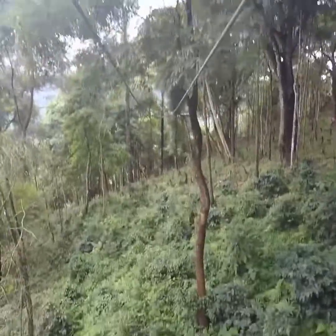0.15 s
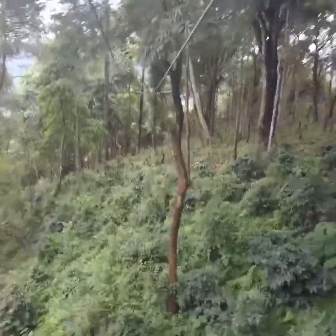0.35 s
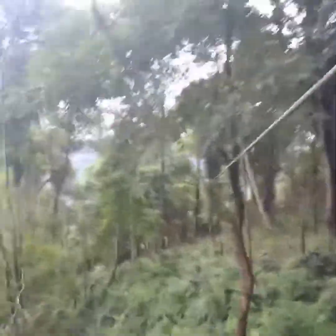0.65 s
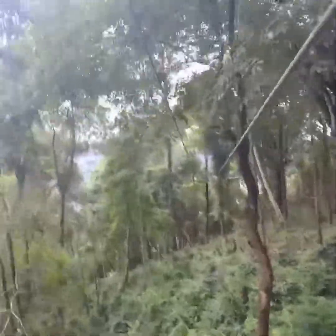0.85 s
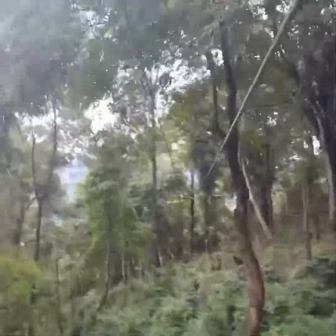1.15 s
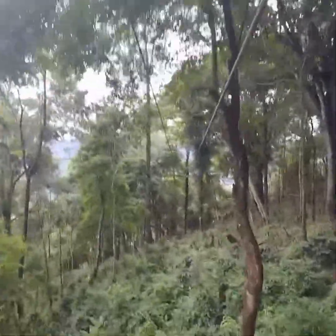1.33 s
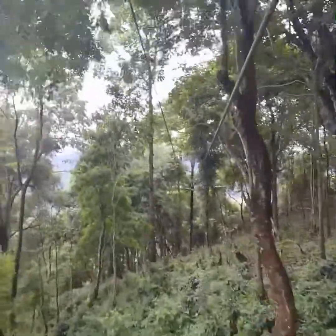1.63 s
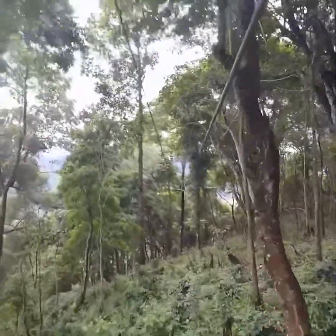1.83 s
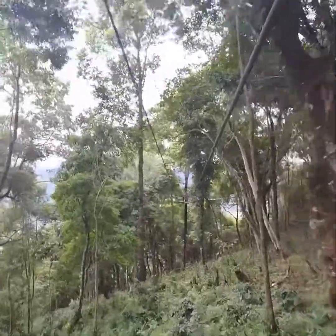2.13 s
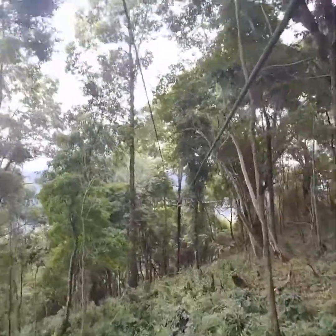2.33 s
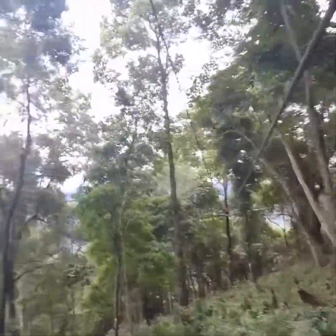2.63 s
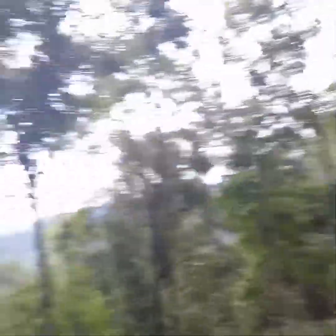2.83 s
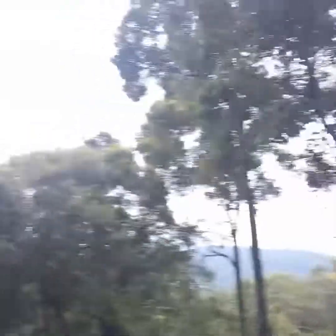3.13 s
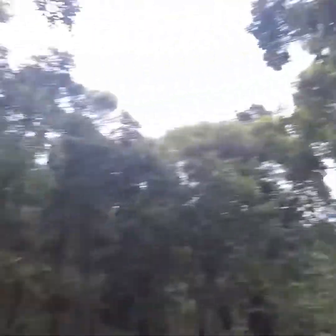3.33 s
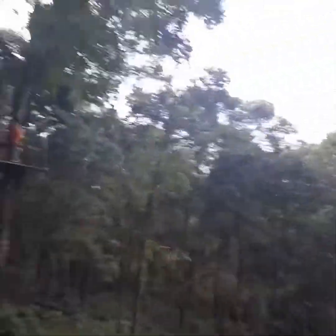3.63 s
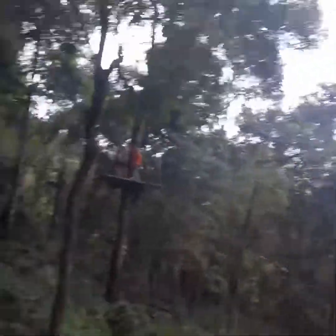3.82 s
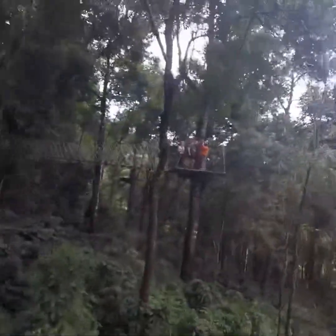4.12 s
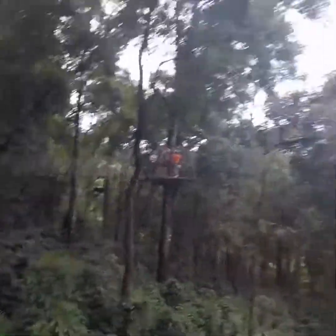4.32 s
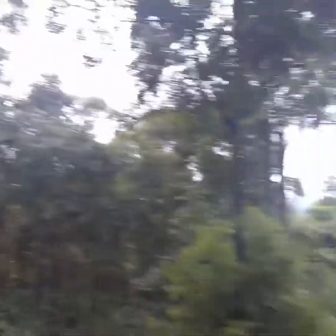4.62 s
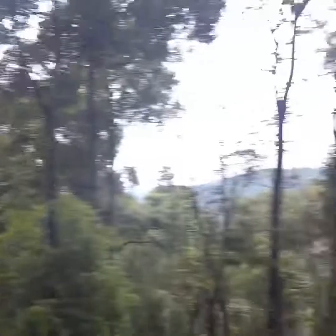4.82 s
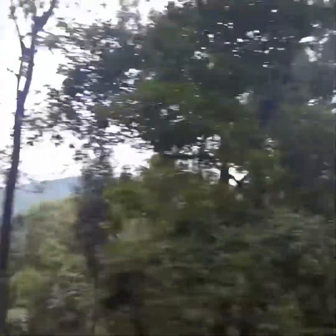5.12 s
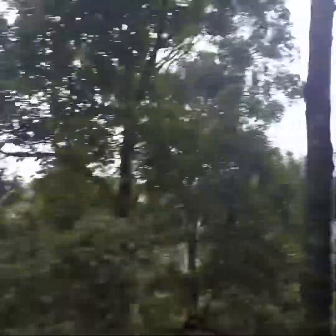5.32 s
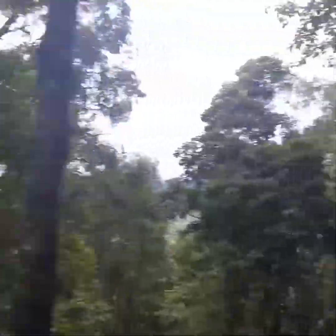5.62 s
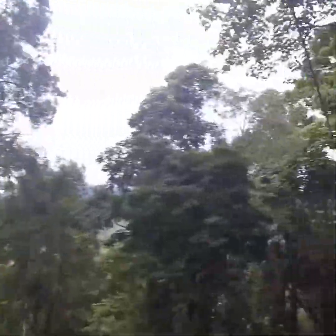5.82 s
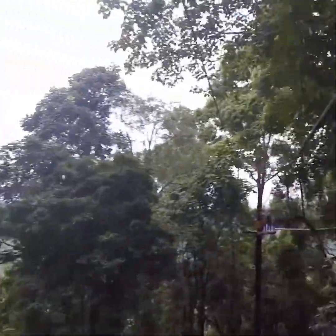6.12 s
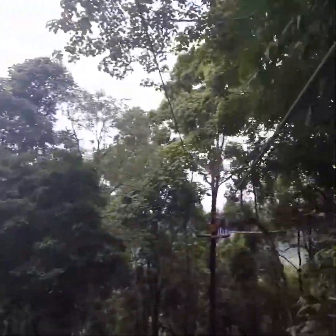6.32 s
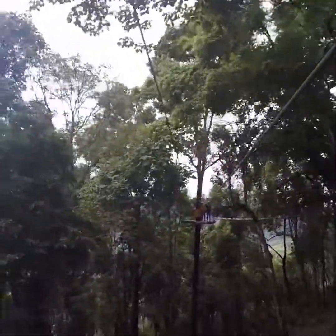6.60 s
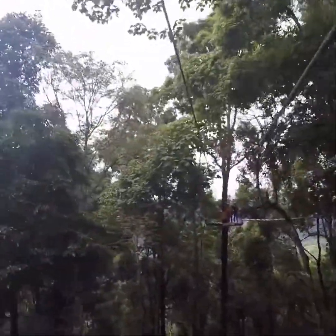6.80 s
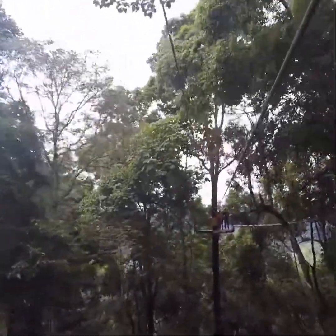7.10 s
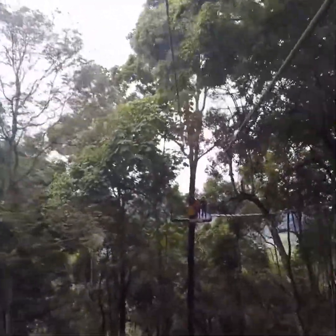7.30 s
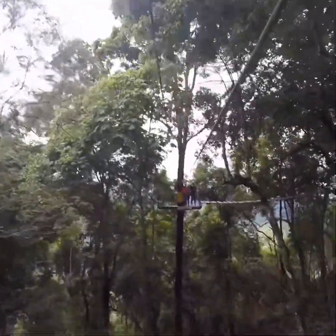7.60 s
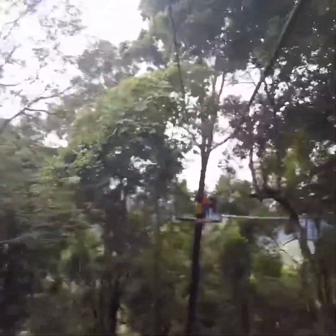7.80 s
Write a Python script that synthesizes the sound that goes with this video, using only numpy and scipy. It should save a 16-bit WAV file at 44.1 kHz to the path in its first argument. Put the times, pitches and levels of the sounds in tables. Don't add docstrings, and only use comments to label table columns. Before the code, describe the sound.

Pulley wheels race along a steel cable, hissing and whining ever higher, while wind rumbles and fingers knock the handheld microphone.

```python
import sys
import numpy as np
from scipy import signal
from scipy.fft import rfft, irfft, next_fast_len
from scipy.io import wavfile
from scipy.ndimage import uniform_filter1d, map_coordinates

SR = 44100
rng = np.random.default_rng(int(sys.argv[2]) if len(sys.argv) > 2 else 0)


def to_linear_factor(level_db):
    exponent = np.asarray(level_db, float) / 20
    return 10 ** exponent


def wav_record(signal):
    frames = np.transpose(np.atleast_2d(signal))
    bounded = np.clip(frames, -1, 1)
    quanta = np.round(bounded * 32767).astype(np.int16)
    wavfile.write(sys.argv[1], SR, quanta)


N = 350595

# [t/s, hiss level/dB]
ROLLING_LEVEL = [(0, -39.5), (.15, -37.5), (.37, -42), (.66, -34), (.8, -32), (1.2, -22), (1.45, -22.5),
                 (2.7, -20.5), (3.12, -24), (3.46, -26.5), (4.4, -27), (4.5, -24), (4.95, -21.5),
                 (5.27, -23), (5.38, -20.5), (5.67, -22.5), (5.85, -20.5), (7.95, -20)]
# [t/s, pose 0 setting off .. 8 near the far end]
CAMERA_POSE = [(0, 0), (.55, 0), (.8, 1), (1, 1), (1.25, 2), (2, 2), (2.9, 3), (3.14, 3), (3.3, 4),
               (3.5, 4), (3.75, 5), (4.55, 5), (4.68, 6), (4.9, 6), (5.3, 7), (5.8, 7), (6.3, 8), (7.95, 8)]


def unit(x):
    return x / np.sqrt(np.mean(x ** 2) + 1e-20)


def along(points, hz):
    f, v = np.transpose(points)
    return np.interp(np.log(hz + 1), np.log(f + 1), v)


def curves(rows):
    s, *cols = np.transpose(rows)
    return [np.interp(np.arange(N) / SR, s, c) for c in cols]


def posed(rows):
    pose, = curves(CAMERA_POSE)
    return [np.interp(pose, np.arange(len(rows)), c) for c in np.transpose(rows)]


def wobble(rate_hz):
    knots = rng.standard_normal(int(N * rate_hz / SR) + 4)
    return map_coordinates(knots, [np.arange(N) * rate_hz / SR])


def filtered(x, response):
    m = next_fast_len(N + SR // 2)
    return irfft(rfft(x, m) * response(np.fft.rfftfreq(m, 1 / SR)), m)[..., :N]


def causal(x, gain):
    m = 8192
    cep = irfft(np.log(gain(np.fft.rfftfreq(m, 1 / SR)) + 1e-6), m)
    cep = np.concatenate([cep[:1], 2 * cep[1:m // 2], np.zeros(m // 2)])
    kernel = irfft(np.exp(rfft(cep)), m)[:m // 2]
    return signal.oaconvolve(x, kernel)[:N]


def mode(f, hz, width_hz):
    return 1j * f * width_hz / (hz * hz - f * f + 1j * f * width_hz)


def impulses(times_s, sizes):
    return np.bincount(np.round(np.asarray(times_s) * SR).astype(int), sizes, N)[:N]


def decaying(hits, decay_s):
    return signal.lfilter([1], [1, -np.exp(-1 / (decay_s * SR))], hits)


def patchy(depth_db, modes_db):
    z = signal.stft(rng.standard_normal(N), nperseg=1024, noverlap=768)[2]
    patches = uniform_filter1d(uniform_filter1d(rng.standard_normal(z.shape), 20, 0), 3, 1)
    modes = uniform_filter1d(rng.standard_normal(z.shape), 18, 1)
    field = to_linear_factor(depth_db * unit(patches) + modes_db * unit(modes))
    return signal.istft(z * field, nperseg=1024, noverlap=768)[1][:N]


def rattle(per_s, spread_db, decay_s):
    when, chance, size = rng.random((int(400 * N / SR), 3)).T
    sizes = to_linear_factor(spread_db * np.minimum(-np.log(size), 2.5))
    hits = impulses(when * (N - 1) / SR, (chance < per_s / 400) * sizes)
    return unit(decaying(hits, decay_s))


def contact_force(pose):
    # [t/s, level over rolling force/dB]
    jolt_table = [
        (.055, 3),
        (.066, -1),
        (0.075, 6),
        (0.0848, 23.5),
        (0.492, 17),
        (0.515, 11),
        (0.611, 17),
        (1.107, 10),
    ]
    s, db = np.transpose(jolt_table)
    jolts = decaying(impulses(s, to_linear_factor(db)), decay_s=.0013)
    loose = .42 + .45 * np.clip(1 - pose, 0, 1)
    knocks = rng.standard_normal(N) * (loose * rattle(per_s=170, spread_db=2.5, decay_s=.003) + jolts)
    rough = patchy(depth_db=1.0, modes_db=3.0) * to_linear_factor(0.11 * wobble(13) + 0.17 * wobble(40))
    return unit(rough) + filtered(knocks, lambda f: 1 - 1 / (1 + (f / 2600) ** 4))


def frame_sound(force, pose):
    # [f/Hz, width/Hz, level above hiss/dB]
    frame_modes = [(1890, 50, 7.5), (2140, 60, 3), (3240, 90, 3), (3740, 60, 5), (4725, 120, 9.5),
                   (5765, 110, 6), (7010, 160, 6), (9080, 180, 5), (10280, 230, 7), (10815, 50, 7.5),
                   (12470, 230, 2.5), (13960, 260, 6.5)]
    directness = [1.5, 1.2, .8, .8, .8, .5, .45, 1.1, 1]
    # [f/Hz, level per Hz/dB]
    setting_off = [(350, -26.4), (690, -26.9), (1050, -11.5), (1620, -17.8), (2150, -2.5), (2750, 0.0),
                   (3050, -12.9), (3350, -3.5), (4550, -14.1), (5000, -20.8), (6350, -6.9), (10250, -20.4),
                   (11150, -33.9), (15200, -36.4)]
    speeding_up = [(350, -38.2), (560, -25.8), (770, -29.3), (1050, -13.6), (1310, -18.4), (2150, -4.9),
                   (3350, 0.0), (5000, -17.0), (6050, -5.7), (6800, -10.9), (10550, -18.6), (11600, -35.7),
                   (13250, -30.5), (15200, -37.9)]
    along_cable = [(350, -32.9), (500, -43.6), (2600, -8.3), (3500, -7.5), (3800, 0.0), (4100, -12.2),
                   (4550, -13.0), (5000, -19.9), (6800, -6.8), (8150, -26.9), (10400, -19.4),
                   (11750, -44.3), (12350, -32.9), (15200, -42.9)]
    swinging_out = [(350, -39.9), (1170, -16.4), (1450, -25.4), (2150, 0.0), (2900, -8.3), (3050, -15.5),
                    (3200, -0.4), (5300, -21.5), (6200, -6.2), (8900, -18.1), (10400, -16.6),
                    (11450, -36.0), (11750, -26.6), (15200, -37.7)]
    turned_away = [(350, -40.7), (1450, -25.0), (2000, -3.1), (3200, -11.2), (3350, 0.0), (3950, -6.2),
                   (4250, -18.2), (6650, -1.8), (8000, -24.1), (9050, -25.5), (10100, -12.0),
                   (11600, -34.3), (13550, -27.9), (15200, -41.1)]
    swinging_back = [(350, -38), (850, -30), (1310, -25), (2000, 0), (2750, 0), (2900, -10), (3350, -2),
                     (5300, -17), (6500, -5), (8450, -19), (10400, -14), (11150, -25), (15200, -35)]
    ahead = [(350, -39.8), (560, -39.7), (1450, -26.7), (1800, -9.5), (3500, -5.2), (3650, 0.0),
             (5000, -21.5), (5750, -7.5), (6350, -16.3), (6800, -5.6), (8450, -25.4), (10100, -17.9),
             (11450, -31.7), (15200, -35.6)]
    poses = [setting_off, speeding_up, along_cable, along_cable, swinging_out, turned_away, swinging_back,
             ahead, ahead]
    sound = np.zeros(N)
    for k, (broad, ring) in enumerate(zip(poses, directness)):
        def gain(f):
            rings = sum((to_linear_factor(db) - 1) * abs(mode(f, c, w)) ** 2 for c, w, db in frame_modes)
            return to_linear_factor(along(broad, f)) * (1 + ring * rings) * f ** 2 / (f ** 2 + 250 ** 2)
        share = np.clip(1 - abs(pose - k), 0, 1)
        sound += share * unit(causal(force, gain))
    return sound


def rolling():
    # [5-11 kHz/dB, under 1.6 kHz/dB, over 11 kHz/dB, shadow near 11.7 kHz/dB]
    tints = [(-1, 3.5, 1, 0), (.5, 2.5, 2, 2), (-1, -0.5, 3.5, -2), (0.5, -2, 5, 1), (-1, 0.5, 2, 0),
             (-1.5, 2, 1.5, 0), (0.5, 3, 4, -2), (1.5, 2.5, 7.5, -9), (-0.5, 0, -1, 5)]
    hiss_db, = curves(ROLLING_LEVEL)
    pose, = curves(CAMERA_POSE)
    bright_db, body_db, air_db, shadow_db = posed(tints)
    sound = frame_sound(contact_force(pose), pose)
    sound += (to_linear_factor(shadow_db) - 1) * filtered(sound, lambda f: np.exp(-((f - 11650) / 420) ** 4))
    low, mid, high = (filtered(sound, lambda f: 1 / (1 + (f / hz) ** 12)) for hz in (1650, 4700, 11100))
    tinted = to_linear_factor(body_db) * low + (mid - low) + to_linear_factor(bright_db) * (high - mid) + to_linear_factor(air_db - 3.5) * (sound - high)
    even = np.sqrt(np.abs(uniform_filter1d((mid - low) ** 2, size=SR // 4)) + 1e-12)
    return to_linear_factor(hiss_db - 0.52) / even * tinted


def strand_rate_hz():
    # [t/s, strand rate f/Hz]
    speed = [(.85, 250.3), (1.07, 291.3), (1.3, 325.2), (1.9, 361.5), (2.15, 380), (2.33, 410), (2.42, 407),
             (2.7, 437.4), (2.95, 437), (3.28, 465.7), (3.5, 456), (3.85, 494), (4.38, 523), (4.62, 496),
             (4.86, 513), (5.2, 527.7), (5.95, 535.8), (7.95, 522.6)]
    # [t/s, lost f/Hz]
    checks = [(4.5, 28), (4.94, 18.6), (5.37, 20.7), (5.77, 21.3), (6.15, 25.3), (6.47, 26.4), (6.79, 24),
              (7.09, 15.6), (7.36, 24.5), (7.6, 7.7), (7.85, 48)]
    width_s, rebound_s, rebound_share = .06, 0.124, .25
    t = np.arange(N) / SR
    rate_hz, = curves(speed)
    for s, lost_hz in checks:
        dip = np.exp(-((t - s) / width_s) ** 2)
        surge = np.exp(-((t - s - rebound_s) / width_s) ** 2)
        rate_hz = rate_hz + lost_hz * (rebound_share * surge - dip)
    return rate_hz


def whine():
    # [partials 1-5 at full rolling force, level/dB]
    partials = [(-64, -63, -74, -50, -60), (-62, -60, -64, -41, -54), (-59, -61, -48.5, -48.5, -47),
                (-62, -52, -49.5, -44, -37.5), (-59, -46, -55, -34.5, -50), (-57, -48.5, -61, -32.5, -56),
                (-54.5, -41.5, -56, -29, -55), (-56, -44.5, -40.5, -32.5, -57),
                (-62.5, -49, -45.5, -40, -60)]
    # [f/Hz, width/Hz, level/dB]
    cable_modes = [(920, 150, 3.5), (1030, 140, 5.5), (1297, 200, 11), (1587, 67, 4), (1810, 143, 9),
                   (1973, 146, 9), (2170, 79, 8.5)]
    rate_hz = strand_rate_hz()
    start = np.clip((np.arange(N) / SR - .8) / 0.29, 0, 1) * to_linear_factor(curves(ROLLING_LEVEL)[0] + 21)
    phase = 2 * np.pi * np.cumsum(rate_hz * (1 + .007 * wobble(16) + .006 * wobble(70))) / SR
    hz = np.arange(100., 3000, 10)
    carried = 1 + sum((to_linear_factor(db) - 1) * abs(mode(hz, c, w)) ** 2 for c, w, db in cable_modes)
    sound = np.zeros(N)
    for k, db in enumerate(posed(partials), 1):
        level = np.sqrt(2) * to_linear_factor(db - 6 + 1.86 * wobble(18))
        sound += level * np.interp(k * rate_hz, hz, carried) * np.sin(k * phase)
    return start * sound


def rubs(upper):
    # [t/s, length/s, hum level/dB, scrape level/dB]
    strokes = [(0.208, .04, -59, -80), (1.745, 0.033, -51, -54), (2.82, 0.17, -44, -42.5),
               (3.04, 0.084, -47.5, -51), (3.212, 0.046, -50, -60), (3.31, .11, -39.5, -51.5),
               (3.457, 0.049, -53, -69), (7.477, 0.025, -30.5, -39), (7.537, 0.12, -49, -46.5),
               (7.71, 0.019, -36, -52), (7.795, .07, -34, -51), (7.904, 0.059, -49, -48)]
    rise_s, fade_s = 0.0043, 0.022
    hum = unit(filtered(rng.standard_normal(N) * to_linear_factor(1.5 * wobble(60)), lambda f: mode(f, 222, 65) ** 2))
    scrape = unit(filtered(rng.standard_normal(N) * to_linear_factor(2.5 * wobble(80)), upper))
    t = np.arange(N) / SR
    sound = np.zeros(N)
    for s, length_s, hum_db, scrape_db in strokes:
        outside = np.maximum((s - t) / rise_s, (t - s - length_s) / fade_s)
        stroke_db = -10 * np.maximum(outside, 0)
        sound += to_linear_factor(stroke_db + hum_db) * hum + to_linear_factor(stroke_db + scrape_db) * scrape
    return sound


def bumps(first_mode, upper):
    # [t/s, peak level/dB, thump level/dB, knock level/dB]
    blows = [
        (2.816, -27, 4, -13),
        (3.031, -35, 7.5, -11),
        (3.091, -37.5, 15, -11),
        (3.317, -34, 2, -12),
        (7.482, -29, 16, -0.5),
        (7.71, -33.5, 11, -13),
        (7.737, -2, -17, -29),
        (7.825, -17.5, 4.5, -10.5),
    ]
    s, db, thump_db, knock_db = np.transpose(blows)
    ring = filtered(impulses(s, to_linear_factor(db + 37.0)),
                    lambda f: mode(f, *first_mode) * mode(f, 210, 300) / (1 + 1j * f / 300))
    thump = filtered(impulses(s, to_linear_factor(db + thump_db + 52)), lambda f: mode(f, 77, 26.6) / (1 + 1j * f / 150) ** 2)
    knock = filtered(impulses(s, to_linear_factor(db + knock_db + 41.5)), lambda f: upper(f) / (1 + 1j * f / 1500) ** 2)
    return ring + thump + knock


def fingers():
    # [f/Hz, width/Hz, level/dB]
    shell_modes = [(215, 35, 0), (750, 140, 0), (1130, 260, -4)]
    upper = lambda f: sum(to_linear_factor(db) * mode(f, c, w) for c, w, db in shell_modes[1:])
    return rubs(upper) + bumps(shell_modes[0][:2], upper)


def pressure_kinks():
    # [t/s, peak level/dB]
    ticks = [(0.524, -37), (0.619, -34), (0.663, -32), (0.713, -28.5), (0.788, -33), (0.848, -32),
             (1.021, -30), (1.07, -34), (1.29, -34), (1.388, -36), (1.482, -33), (1.548, -37), (1.689, -31),
             (2.32, -36), (3.679, -32.5), (3.732, -31), (3.849, -31), (3.961, -35), (4.042, -37),
             (4.437, -36), (4.695, -36), (4.806, -32), (5.264, -35), (5.327, -36), (5.876, -33),
             (6.569, -33), (6.633, -34), (6.943, -37), (7.209, -36), (7.236, -35)]
    faint_db = -44.5
    s, db = np.transpose(ticks)
    kinks = impulses(s + 0.00187, to_linear_factor(db + 32) * rng.choice([-1, 1], len(s)))
    when, size, sign = rng.random((16, 3)).T
    faint = to_linear_factor(faint_db + 32.5 + 6 * (size - .5)) * np.sign(sign - .5)
    kinks += impulses(when * (N - 1) / SR, faint)
    return filtered(kinks, lambda f: mode(f, 220, 550) / (1 + 1j * f / 900) ** 3)


def wind():
    # [t/s, buffet level/dB]
    gust_table = [(0.0, -36), (0.35, -40.5), (0.55, -23.5), (2.01, -38.5), (4.12, -32.5), (4.27, -52),
                  (4.32, -37), (5.56, -38), (5.64, -45), (6.44, -36), (6.69, -42.5), (6.77, -34.5),
                  (7.37, -38), (7.46, -35), (7.48, -23.5), (7.59, -36.5), (7.84, -21), (7.95, -39)]
    # [f/Hz, level per Hz/dB]
    rumble = [(7.1, 2), (12, 6), (33, 3.5), (51, -2.5), (65, -12.5), (95, -23), (232, -32), (400, -50.5),
              (520, -56), (880, -120)]
    gusty_db, flutter_start_db, flutter_db_per_s, flutter_share = 2, -3, 1, 0.89
    buffet_db = curves(gust_table)[0] + 2.4 + gusty_db * wobble(3.4)
    flutter_db = flutter_start_db + flutter_db_per_s * np.arange(N) / SR
    flutter_db -= flutter_share * (buffet_db - buffet_db.mean())
    air = filtered(rng.standard_normal(N), lambda f: to_linear_factor(along(rumble, f)))
    lumps = unit(to_linear_factor(0.87 * wobble(5.2)) * air)
    flutter = filtered(lumps, lambda f: 1 - 1 / (1 + (f / 85) ** 6))
    gusts = to_linear_factor(buffet_db) * (lumps + (to_linear_factor(flutter_db) - 1) * flutter)
    return gusts + pressure_kinks()


def scene():
    return np.tile(rolling() + whine() + fingers() + wind(), (2, 1))


def roll_off(x):
    return signal.sosfilt(signal.butter(12, 15220, fs=SR, output="sos"), x)


def record(dry):
    # [t/s, from f/Hz, to f/Hz, level/dB]
    splits = [
        (4.575, 6200, 7640, -41),
        (4.575, 10300, 11800, -46),
        (5.855, 8900, 10500, -35),
        (7.574, 6230, 7640, -32),
    ]
    t = np.arange(N) / SR
    side = np.zeros(N)
    for s, lo_hz, hi_hz, db in splits:
        fade = np.cos(np.pi / 2 * np.clip((t - s) / 0.024, -1, 1))
        band = filtered(rng.standard_normal(N), lambda f: (f > lo_hz) * (f < hi_hz))
        side += to_linear_factor(db) * fade * unit(band)
    return roll_off(dry + [side, -side])


dry = scene()
out = record(dry)
wav_record(out)
```